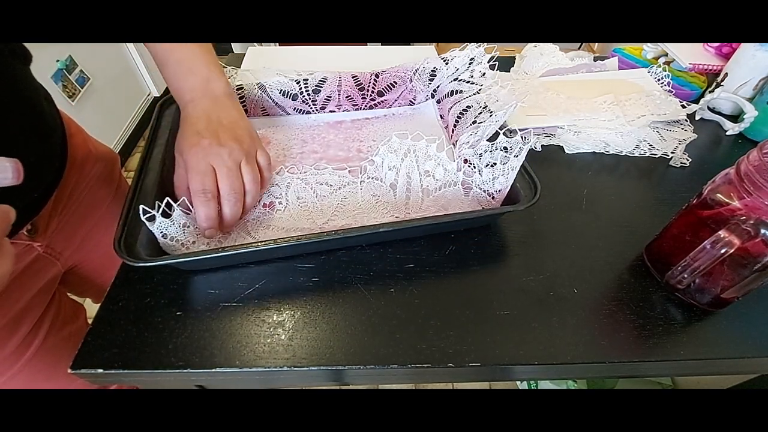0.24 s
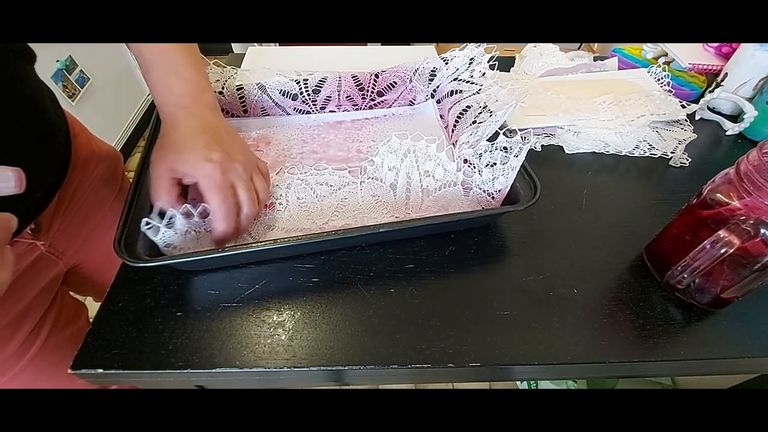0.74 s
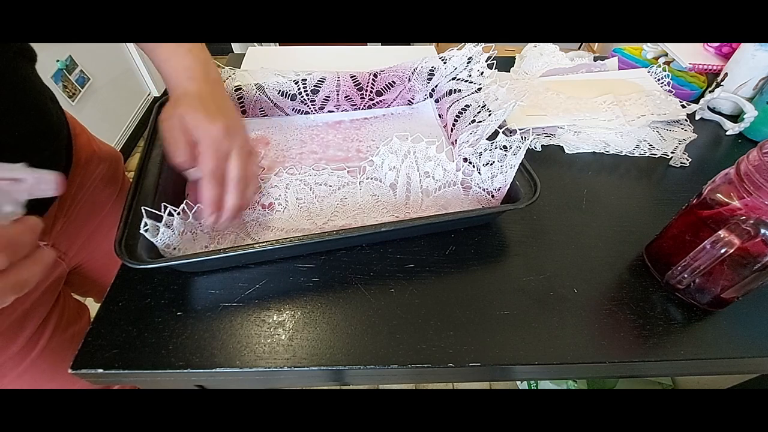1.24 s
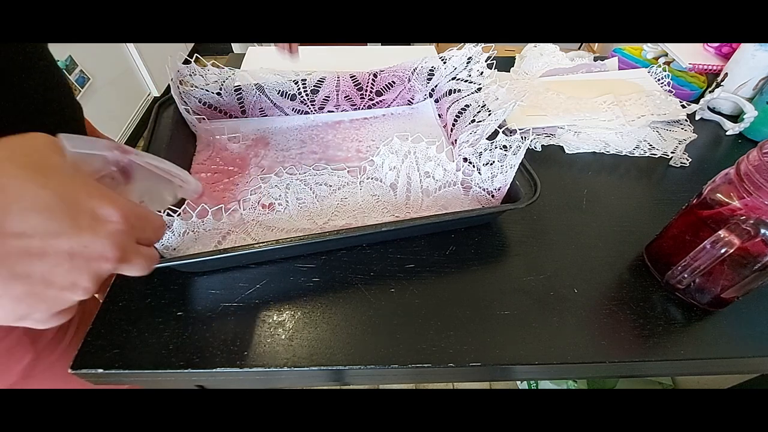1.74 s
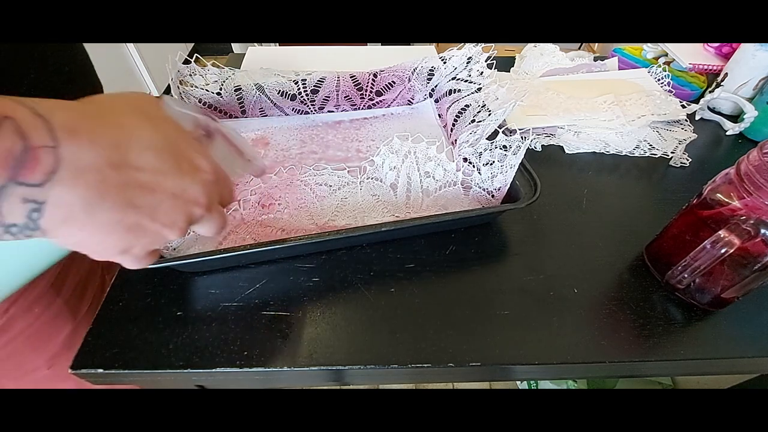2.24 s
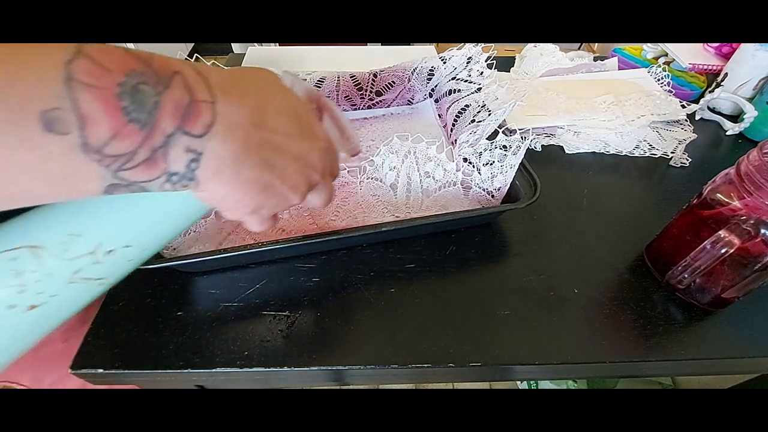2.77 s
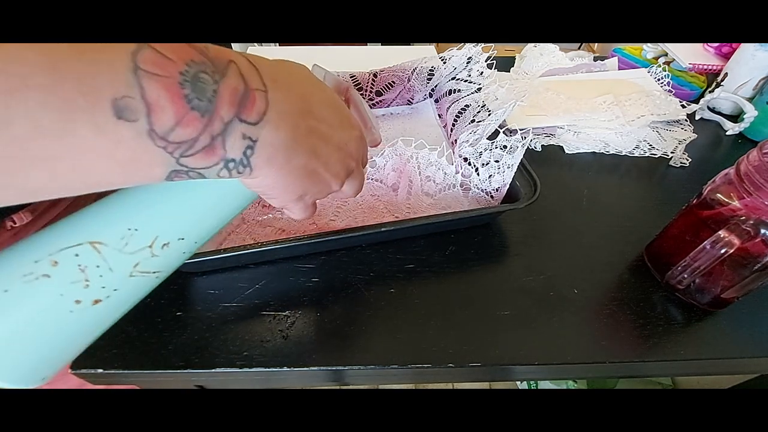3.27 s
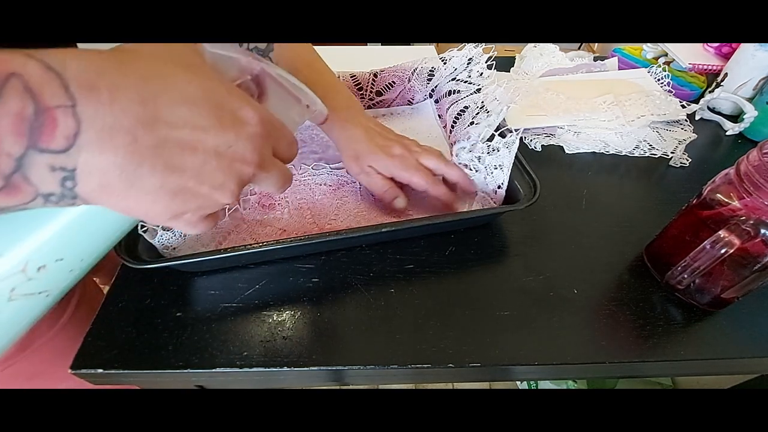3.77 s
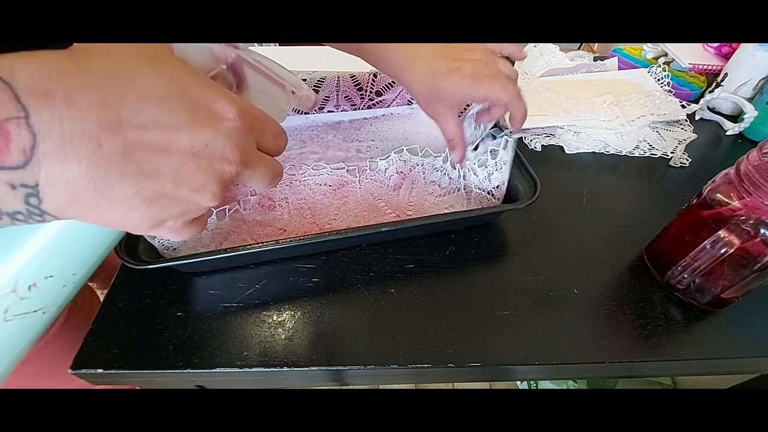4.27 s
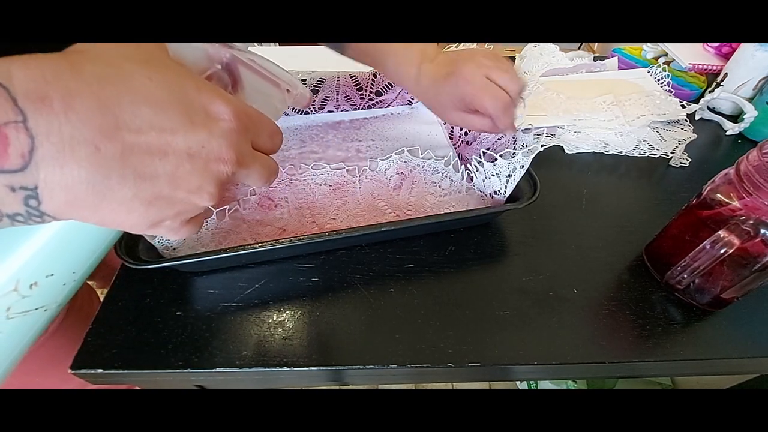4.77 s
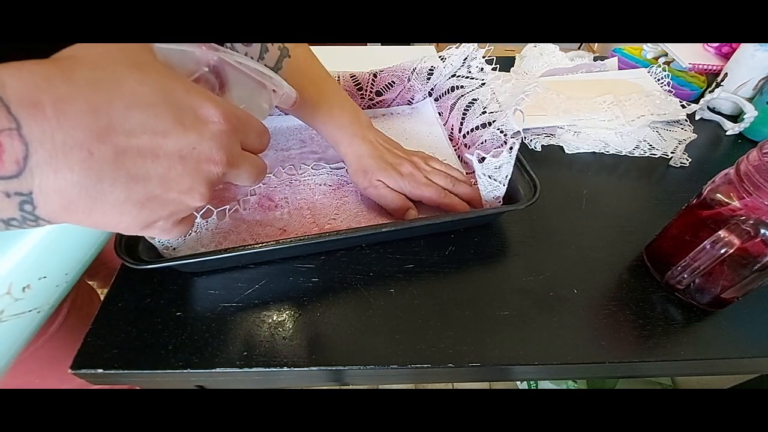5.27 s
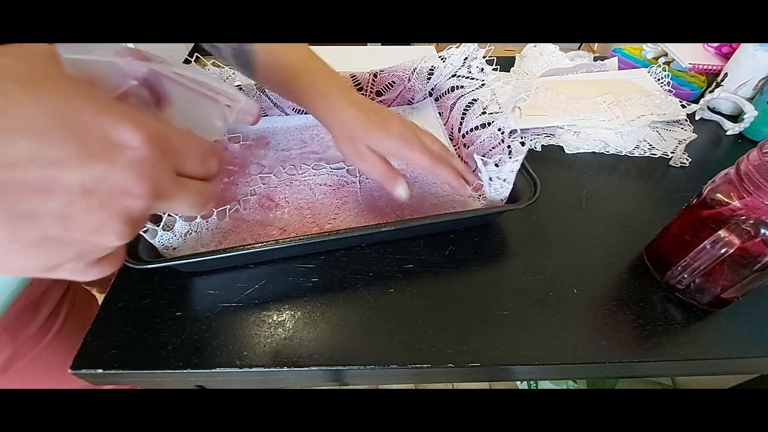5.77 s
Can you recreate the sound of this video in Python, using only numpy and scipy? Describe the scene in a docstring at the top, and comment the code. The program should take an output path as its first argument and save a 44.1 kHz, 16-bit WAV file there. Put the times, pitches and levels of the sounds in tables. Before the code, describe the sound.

Quiet paper handling and a small tray knock come first. Before two seconds the trigger clicks and four airy squirts follow, about a third of a second apart, by far the loudest sounds. The trigger springs back with a click and faint air seeps in. Then soft low thuds of the metal tray, pats and light rustles, heard in close stereo in a small room with low rumble.

```python
"""Trigger spray bottle over a metal tray

Four quick squeezes mist lace and paper in a metal baking tray, close by, in a small room: swelling noise.
The trigger ticks (noise puffs, lever modes) and the hollow bottle rings (one unsteady note) before each hiss.
The free hand smooths and pats the paper (shaped noise) and rocks the tray on the table (ringing modes)."""
import sys
import numpy as np
from scipy import signal
from scipy.fft import rfft, irfft, next_fast_len
from scipy.io import wavfile
from scipy.ndimage import map_coordinates

SR = 44100
rng = np.random.default_rng(int(sys.argv[2]) if len(sys.argv) > 2 else 0)


def transcribe(u):
    """Save the signal u as a 16-bit wav file named by the first command-line argument.

    u: samples, shape (n,) or (channels, n), limited to [-1, 1]; the rate is SR.
    q: integer samples, one column per channel.
    """
    v = np.clip(np.atleast_2d(u).T, -1, 1)
    q = np.round(v * 32767).astype(np.int16)
    wavfile.write(sys.argv[1], SR, q)


N = 265372
GRID_HZ = np.fft.rfftfreq(2 ** 14, 1 / SR)  # grid of all colour curves
AGE_S = np.arange(SR // 2) / SR  # time since the start of an event
AGE_N = len(AGE_S)
STROKE_S = 0.18  # travel of the piston

# trigger squeezes: start_s, peak_level_db, fine_hiss_gain_db, strongest_band_hz, end_bump_db
SQUEEZES = [(1.802, -25, -2.5, 6400, -57.5), (2.153, -26.5, -3, 1900, -60), (2.502, -25.5, -4, 3700, -57),
            (2.872, -27, -4, 3900, -52)]
# colour of a plastic tick, also of drops on paper: freq_hz, level_db
TICK_COLOUR = [(500, -2), (1300, -12.5), (2050, -3), (2700, -10.5), (3500, 1), (4600, -6.5), (5500, -5),
               (6400, -6.5), (8500, -13), (11400, -12), (15000, -15.5)]


def mist(spatter_db=0.5, flutter_db=0.06, echo_db=-0.5):
    """The jet breaks into droplets: dense, slightly gritty hiss that swells with the finger's pressure."""
    # hiss colour: freq_hz, density_db_per_hz
    hiss_colour = [(170, -34), (300, -13.5), (600, -7), (1100, -2.5), (1400, 0.5), (1750, 0.5), (2000, -1),
                   (2400, 1), (4100, 1.5), (5100, -0.5), (9500, -1), (12200, 1.5), (13300, -1.5),
                   (15800, -5)]
    # left-right colour difference: freq_hz, left_minus_right_db
    side_colour = [(1000, -1), (3000, -1), (5000, 0.5), (7800, 2.5), (9400, -6), (11000, -5.5),
                   (13000, -0.5), (15500, -3)]
    # bottle swings from left across centre: time_s, left_mic_lead_s
    nozzle_lead = [(1.8, .00014), (2.9, -.00007)]
    linger_t60_s = 0.28
    focus_db, focus_octaves = 1.5, 0.4  # lift and width of the strongest band
    thin_db = 0.03  # fine hiss gained as the flow falls from full to none
    whistle_hz, whistle_half_width_hz, whistle_db = 12600, 110, -43

    out = np.zeros((2, N))
    fine_gain = 1 / (1 + (7000 / (GRID_HZ + 1)) ** 6)
    flow = swell(STROKE_S, linger_t60_s)
    for start_s, level_db, fine_db, focus_hz, _ in SQUEEZES:
        # the nozzle moves between squeezes, so the echoes colour each one afresh
        source = rng.standard_normal((1, 2 * AGE_N))
        left, right = signal.fftconvolve(source, room(wet_db=-3), axes=1)[:, AGE_N:2 * AGE_N]
        lead_s = np.interp(start_s, *np.transpose(nozzle_lead))
        nozzle = np.array([left, np.roll(right, round(lead_s * SR))])

        # the droplet cloud and its landing are spread wide
        cloud = noise(np.ones(len(GRID_HZ)), size=AGE_N)
        jet = amp(echo_db) * unit(nozzle) + cloud
        jet *= amp(spatter_db * wobble(2500, size=AGE_N) + flutter_db * wobble(115.4, size=AGE_N))

        focus = np.exp(-(np.log2((GRID_HZ + 1) / focus_hz) / focus_octaves) ** 2)
        colour_db = along(hiss_colour) + focus_db * focus
        half_side_db = along(side_colour) / 2
        left = filtered(jet[0], amp(colour_db + half_side_db))
        right = filtered(jet[1], amp(colour_db - half_side_db))
        jet = unit(np.array([left, right]))

        fine = filtered(jet, fine_gain)
        fine_share = np.clip(amp(fine_db + thin_db * (2.5 - flow)), 0.1, 0.9)
        spray = fine_share * unit(fine) + np.sqrt(1 - fine_share ** 2) * unit(jet - fine)
        add(out, start_s, amp(level_db) * (spray * flow + spits(flow)))

    # the nozzle sings during the first squeeze
    whistle = noise(1 / (1 + ((GRID_HZ - whistle_hz) / whistle_half_width_hz) ** 2), size=AGE_N)
    add(out, SQUEEZES[0][0], amp(whistle_db) * whistle * flow)
    return out


def spits(flow, count=14, peak_db=3, spread_db=2.5):
    """Larger drops leave the nozzle at random, mostly at strong flow, and tick on the paper."""
    drops = np.zeros((2, AGE_N))
    chance = np.cumsum(flow ** 2) / np.sum(flow ** 2)
    at = np.searchsorted(chance, rng.uniform(0, 0.99, count))
    drops[:, at] = amp(peak_db + rng.normal(0, spread_db, (2, count))) * flow[at]
    tick_gain = amp(along(TICK_COLOUR))
    return filtered(drops, tick_gain / tick_gain.mean())


def trigger(tick_t60_s=0.0056, lever_t60_s=0.016):
    """The trigger snaps, jolts the plastic bottle and rubs on; each stroke ends in a softer bump."""
    # trigger taken up or sprung back: start_s, tick_db, tilt_db_per_octave, bottle_pitch_hz, bottle_db
    moves = [(1.736, -59.5, -2, 320, -65), (1.778, -57, -7, 289.3, -42.5), (2.115, -49, 2, 296.4, -44.5),
             (2.463, -48.5, 1, 313.7, -47.5), (2.818, -48, 0.5, 287.6, -48),
             (3.199, -50.5, -2, 336.6, -53.5)]
    # modes of the trigger lever: freq_hz, level_db
    lever_modes = [(1300, -14.5), (2050, -17), (3550, -14.5), (4120, -12), (4800, -16.5)]
    rub_db, rub_s, rub_t60_s = -4.5, 0.05, 0.13  # lever on piston, relative to the tick
    stop_hz = 310.6  # bottle note when the piston reaches its stop

    out = np.zeros((2, N))
    walls = room(wet_db=-3)
    for start_s, tick_db, tilt_db, pitch_hz, bottle_db in moves:
        colour = amp(along(TICK_COLOUR) + tilt_db * np.log2(np.maximum(GRID_HZ, 1000) / 1000))
        lever = np.zeros(AGE_N)
        for mode_hz, mode_db in lever_modes:
            mode_gain = amp(mode_db + rng.normal(0, 4) + tilt_db * np.log2(mode_hz / 3500))
            lever += mode_gain * np.sin(2 * np.pi * mode_hz * AGE_S)
        tick = burst(colour, tick_t60_s) + lever * fade(lever_t60_s)
        rub = amp(rub_db) * noise(colour, size=AGE_N) * swell(rub_s, rub_t60_s)
        add(out, start_s, amp(tick_db) * (heard(tick, walls) + rub) + amp(bottle_db) * bottle(pitch_hz))
    for start_s, *_, bump_db in SQUEEZES:
        add(out, start_s + STROKE_S, amp(bump_db) * bottle(stop_hz))
    return out


def bottle(pitch_hz, slosh_db=3.0, slosh_rad=0.625):
    """The wall of the hollow bottle rings at one low note; liquid moving inside makes it unsteady."""
    phase = 2 * np.pi * pitch_hz * AGE_S + slosh_rad * wobble(110, size=AGE_N)
    slosh = amp(slosh_db * wobble(130, size=AGE_N))
    return blow(np.sin(phase) * slosh * touch(rise_s=0.0076, t60_s=0.39))


def vent(start_s=3.2, level_db=-62):
    """After the last release, air seeps back into the bottle: noise that builds and dies away."""
    # colour of the indrawn air: freq_hz, level_db
    air_colour = [(200, -10), (350, 10), (700, 8), (1300, 0.5), (2500, 3.5), (4000, -7), (5300, -1),
                  (7000, -0.5), (8800, -15), (15000, -15)]
    out = np.zeros((2, N))
    seep = noise(amp(along(air_colour)), size=AGE_N) * touch(rise_s=0.14, t60_s=1.6)
    add(out, start_s, amp(level_db) * seep)
    return out


def tray(thud_db=1, thud_t60_s=0.015, spread_rad=0.63):
    """The tray rocks on the table: each knock excites the same sheet-metal modes."""
    # knocks on the table: start_s, level_db, contact_low_edge_hz, contact_high_edge_hz, paper_crack_db
    knocks = [(.346, -42, 810, 1136, -43.5), (1.778, -44.5, 330, 710, -56), (3.802, -38.5, 178, 870, -73),
              (5.084, -39.5, 180, 840, -61.5), (5.280, -41.5, 188, 810, -76), (5.498, -42.5, 197, 705, -78)]
    # sheet-metal modes: freq_hz, level_db, t60_s
    tray_modes = [(150.7, -8, 0.28), (243, -7.5, 0.3), (325.3, 0.5, 0.21), (373.6, -11.5, 0.16),
                  (439, -11, 0.2), (508, -6, 0.35), (560, -12, 0.2), (710, -6.5, 0.24), (797, -5.5, 0.17),
                  (928, -11, 0.27), (959, -15.5, .2), (1050, -6, 0.123), (1140, -14.5, 0.2),
                  (1250, -14.5, 0.32), (1319, -6, 0.26), (1590, -14, .2), (2145, -16, 0.21)]
    # body of a knock: freq_hz, level_db
    thud_colour = [(60, -8), (150, -6.5), (300, 18), (800, 16), (2000, 7.5), (6000, -34)]
    # stiff paper on the rim: freq_hz, level_db
    crack_colour = [(300, -14), (600, -18), (1000, -12.5), (1700, -5), (3000, -2), (6000, -5.5),
                    (10000, -9.5), (15000, -11)]

    out = np.zeros((2, N))
    walls = room(wet_db=-0.5)
    for start_s, level_db, low_hz, high_hz, crack_db in knocks:
        ring = np.zeros((2, AGE_N))
        for mode_hz, mode_db, t60_s in tray_modes:
            # the higher a mode, the more its phase differs between the microphones
            phase = rng.normal(0, spread_rad * mode_hz / 700, (2, 1))
            mode = np.sin(2 * np.pi * mode_hz * AGE_S + phase) * fade(t60_s)
            ring += amp(mode_db + rng.normal(0, 1)) * mode
        ring *= 1 - np.exp(-AGE_S / 0.0026)
        thud = burst(amp(along(thud_colour)), thud_t60_s)
        body = blow(ring) + amp(thud_db) * heard(thud, walls)

        # a hard, light contact feeds the high modes; a soft, heavy one the low modes
        high_cut = signal.butter(3, high_hz, fs=SR, output="sos")
        low_cut = signal.butter(2, low_hz, "high", fs=SR, output="sos")
        knock = signal.sosfilt(np.vstack([high_cut, low_cut]), body)
        crack = burst(amp(along(crack_colour)), t60_s=0.042) * (1 - np.exp(-AGE_S / 0.001))
        add(out, start_s, amp(level_db) * blow(knock) + amp(crack_db) * heard(crack, walls))
    return out


def hand(grain_db=2.0, catch_db=1.25):
    """Dull pats through the table, and fibres catching as the fingers slide over paper."""
    # palm presses the tray down: start_s, level_db, centre_hz, table_boom_db
    pats = [(.235, -60, 205, -70), (1.445, -50.5, 286, -43.5), (2.869, -48, 203, -54),
            (3.595, -54.5, 171, -63), (4.742, -56.5, 190, -69), (5.148, -58, 235, -52),
            (5.52, -50, 197, -69)]
    # hand brushes paper and lace: start_s, length_s, level_db, tilt_db_per_octave
    rustles = [(0, .16, -58.5, -1), (0.138, 0.084, -60, 1.5), (0.473, 0.052, -59.5, -1),
               (0.598, .08, -67, 2.5), (0.875, 0.069, -58.5, 0), (1.201, 0.11, -68, 2),
               (1.441, 0.033, -43, -3.5), (3.569, 0.11, -58.5, 2.5), (3.73, 0.14, -63.5, -1.5),
               (4.013, 0.032, -58.5, 10.5), (5.04, 0.019, -57, 0.5), (5.071, 0.12, -62.5, 2),
               (5.189, 0.016, -56, 3.5), (5.528, 0.017, -50.5, -6), (5.711, 0.07, -57.5, 9)]
    # paper colour: freq_hz, level_db
    paper_colour = [(250, -51), (700, -1), (2500, -3.5), (6000, -7), (10000, -12), (15000, -17)]
    table_hz, rustle_t60_s = 61, 0.33

    out = np.zeros((2, N))
    press = swell(0.044, t60_s=0.46)
    sag = swell(0.065, t60_s=0.29)  # the table top follows more slowly
    press_rms, sag_rms = np.sqrt(np.mean(press ** 2)), np.sqrt(np.mean(sag ** 2))
    for start_s, level_db, centre_hz, boom_db in pats:
        pat_ratio, boom_ratio = GRID_HZ / centre_hz, GRID_HZ / table_hz
        pat = noise(pat_ratio ** 2 / (1 + pat_ratio ** 4.07), size=AGE_N) * press
        boom = noise(boom_ratio ** 4 / (1 + boom_ratio ** 6.2), size=AGE_N) * sag
        add(out, start_s, amp(level_db) * unit(pat) * press_rms + amp(boom_db) * unit(boom) * sag_rms)
    for start_s, length_s, level_db, tilt_db in rustles:
        colour_db = along(paper_colour) + tilt_db * np.log2(np.maximum(GRID_HZ, 400) / 2000)
        fibres = noise(amp(colour_db), size=AGE_N)
        catching = amp(grain_db * wobble(696.7, size=AGE_N) + catch_db * wobble(75.4, size=AGE_N))
        add(out, start_s, amp(level_db) * unit(fibres * catching) * swell(length_s, rustle_t60_s))
    return out


def room_tone(level_db=-64.5, waver_db=2.5, flicker_db=2.5):
    """Faint rumble and hiss, with the wavering hum of an appliance."""
    # air colour: freq_hz, level_db
    air_colour = [(25, -18), (40, -17), (56, 1), (80, -5.5), (100, -6.5), (155, -2), (195, -18), (250, -3),
                  (450, -2.5), (700, -11.5), (1500, -19.5), (3500, -26.5), (7000, -27.5), (11500, -19.5),
                  (15800, -27.5)]
    # appliance partials: freq_hz, rms_level_db
    hum_partials = [(55, -75), (441, -78), (1435, -90.5), (1846, -96), (2812, -87.5)]
    time_s = np.arange(N) / SR
    hum = np.zeros(N)
    for partial_hz, partial_db in hum_partials:
        gain = amp(partial_db + waver_db * wobble(8.2) + flicker_db * wobble(30))
        phase = 2 * np.pi * partial_hz * time_s + 1.3 * wobble(5 + partial_hz / 45)
        hum += gain * np.sqrt(2) * np.sin(phase)
    return amp(level_db + 0.29 * wobble(2.3)) * noise(amp(along(air_colour))) + hum


def room(wet_db):
    """Stereo response: the direct sound, echoes from table and walls, and a diffuse tail."""
    # early echoes: delay_s, gain
    echoes = [(.003, .35), (0.0111, .65), (.018, .45), (.022, .45)]
    # decay of the tail: freq_hz, t60_s
    tail_decay = [(150, 0.63), (400, 0.44), (1000, 0.35), (3000, 0.25), (8000, 0.24), (15000, 0.072)]
    diffuse = noise(np.ones(len(GRID_HZ)), size=AGE_N)
    hz, frame_s, spectrum = signal.stft(diffuse, SR, nperseg=256)
    spectrum = spectrum * amp(-60 * frame_s / along(tail_decay, hz)[:, None])
    tail = signal.istft(spectrum, SR, nperseg=256)[1][:, :AGE_N]
    tail *= 1 - np.exp(-AGE_S / 0.014)
    response = amp(wet_db) * tail / np.linalg.norm(tail[0])
    response[:, 0] += 1
    for delay_s, gain in echoes:
        # each echo reaches the two microphones at its own moment
        arrival_s = abs(delay_s + rng.normal(0, 0.00012, 2))
        response[[0, 1], (arrival_s * SR).astype(int)] += gain
    return response


def heard(sound, response):
    """A blow with the room's answer."""
    wet = signal.fftconvolve(np.atleast_2d(sound), response, axes=1)
    return blow(wet[:, :AGE_N])


def noise(gain, size=N):
    """Coloured stereo noise of rms 1: the bass is shared by both microphones, the treble is not."""
    # likeness of the two microphones: freq_hz, left_right_correlation
    likeness = [(60, 0.87), (300, 0.7), (640, 0.14), (1400, 0.0954), (3000, 0.013), (15000, .02)]
    turn = np.arccos(np.clip(along(likeness), -1, 1)) / 2
    mid = filtered(rng.standard_normal(size), gain * np.cos(turn))
    side = filtered(rng.standard_normal(size), gain * np.sin(turn))
    return unit(np.array([mid + side, mid - side]))


def burst(gain, t60_s):
    """A dying puff of coloured noise."""
    return noise(gain, size=AGE_N) * fade(t60_s)


def fade(t60_s):
    """A dying envelope."""
    return amp(-60 * AGE_S / max(t60_s, 1e-4))


def touch(rise_s, t60_s):
    """Envelope of a soft touch: it builds, then dies away."""
    rise = np.clip(AGE_S / max(rise_s, 0.002), 0, 1)
    return rise * amp(-60 * np.maximum(AGE_S - rise_s, 0) / max(t60_s, 0.01))


def swell(length_s, t60_s):
    """Envelope of a smooth push: a half sine whose sound lingers and dies away."""
    push = np.sin(np.pi * np.clip(AGE_S / max(length_s, 0.002), 0, 1))
    keep = amp(-60 / (SR * max(t60_s, 0.01))) ** 2  # power kept per sample
    power = signal.lfilter([1], [1, -keep], push ** 2)
    return np.sqrt(power / power.max())


def wobble(rate_hz, size=N):
    """A smooth random curve with rate_hz knots a second."""
    knots = rng.standard_normal(int(size * rate_hz / SR) + 4)
    return map_coordinates(knots, [np.arange(size) * rate_hz / SR])


def amp(db):
    """Decibels to gain."""
    return 10 ** (np.asarray(db) / 20)


def unit(x):
    """x at rms 1."""
    return x / np.sqrt(np.mean(x ** 2) + 1e-20)


def blow(sound):
    """A blow at rms 1 over its first 25th of a second."""
    return sound / np.sqrt(np.mean(sound[..., :SR // 25] ** 2))


def along(points, hz=GRID_HZ):
    """(Hz, value) points read on a log frequency axis."""
    f, v = np.transpose(points)
    return np.interp(np.log(hz + 1), np.log(f + 1), v)


def filtered(x, gain):
    """x through a gain given on GRID_HZ."""
    n = x.shape[-1]
    m = next_fast_len(n + 4096, True)
    response = np.interp(np.fft.rfftfreq(m, 1 / SR), GRID_HZ, gain)
    return irfft(rfft(x, m) * response, m)[..., :n]


def add(track, start_s, sound):
    """Mix a sound in at start_s."""
    part = track[:, max(round(start_s * SR), 0):][:, :sound.shape[-1]]
    part += sound[..., :part.shape[1]]


def panned(x, left_minus_right_db):
    """x with its left-right balance shifted."""
    return x * amp([[left_minus_right_db / 2], [-left_minus_right_db / 2]])


def scene():
    """All sources at the two microphones."""
    out = mist()
    out = out + panned(trigger() + vent(), 2)
    out = out + panned(tray(), -1.5) + panned(hand(), -1.5)
    return out + panned(room_tone(), -3.0)


def record(dry, top_hz=15800):
    """The microphones' sound is band-limited: nothing above top_hz is kept."""
    return filtered(dry, 1.0 * (GRID_HZ < top_hz))


dry = scene()
out = record(dry)
transcribe(out)
```